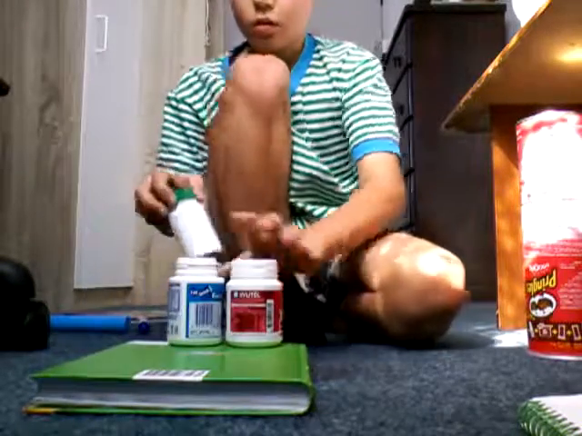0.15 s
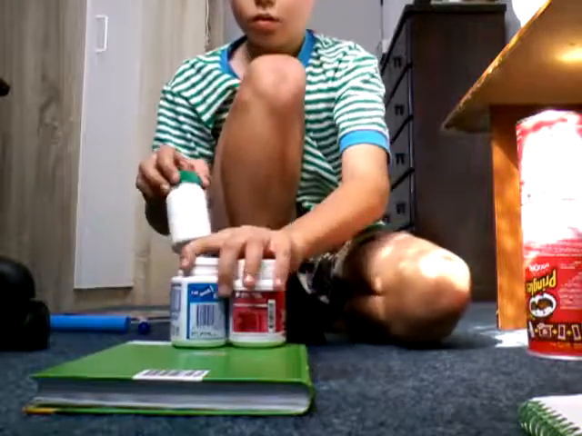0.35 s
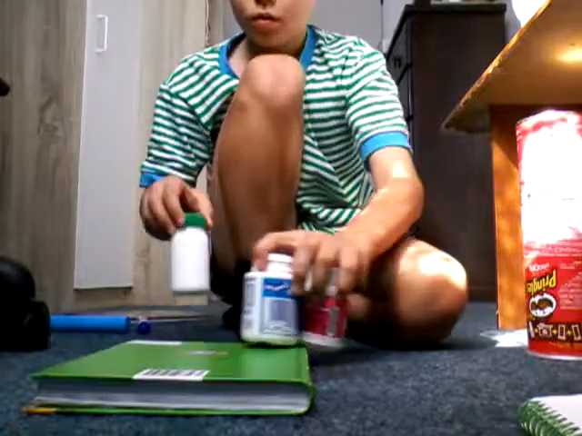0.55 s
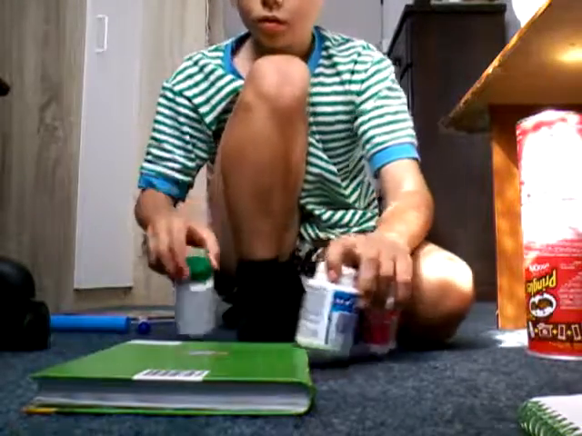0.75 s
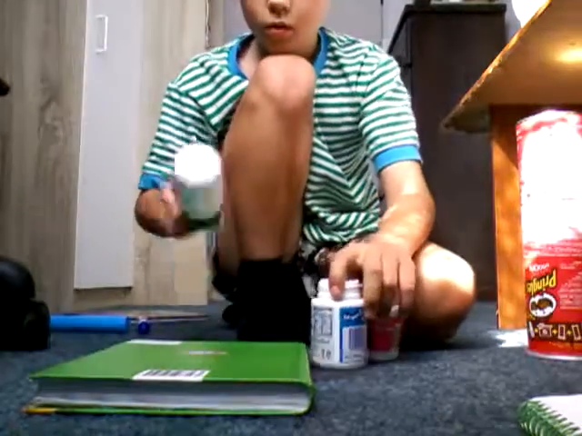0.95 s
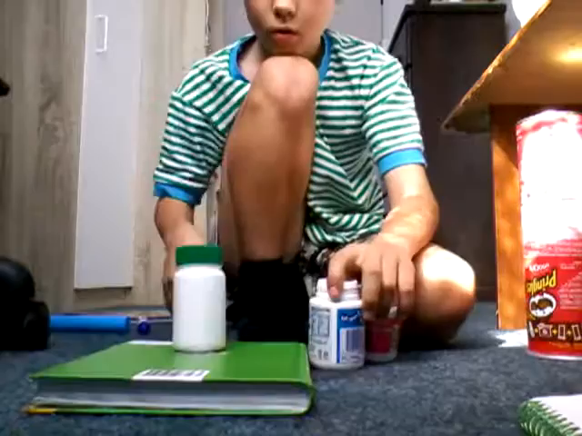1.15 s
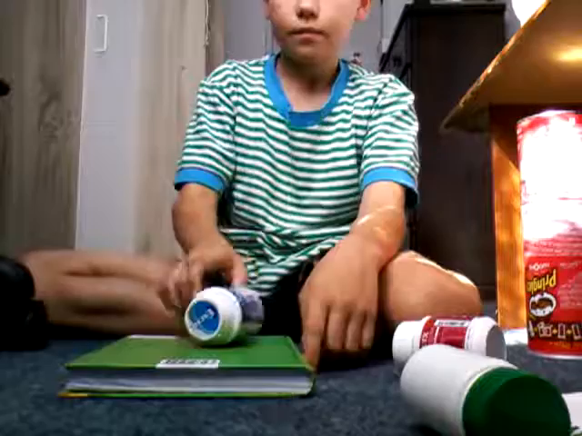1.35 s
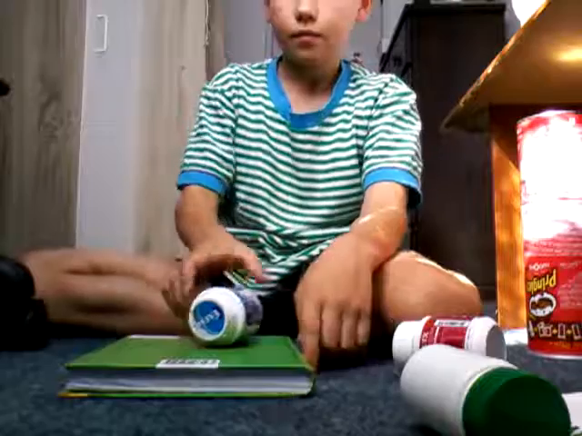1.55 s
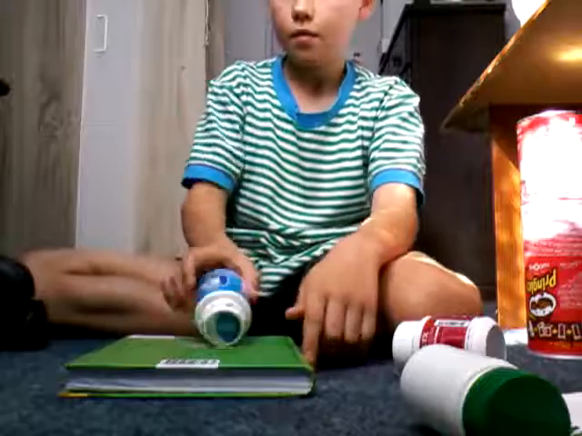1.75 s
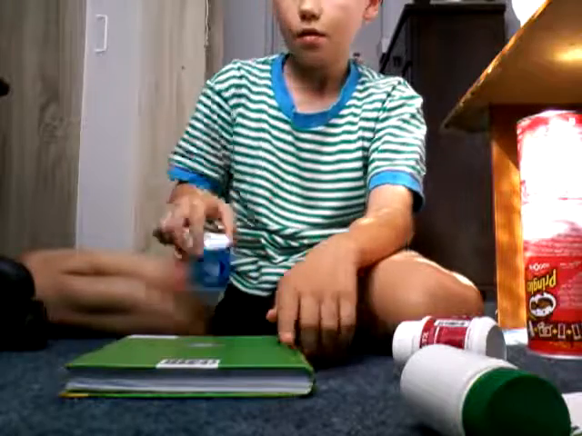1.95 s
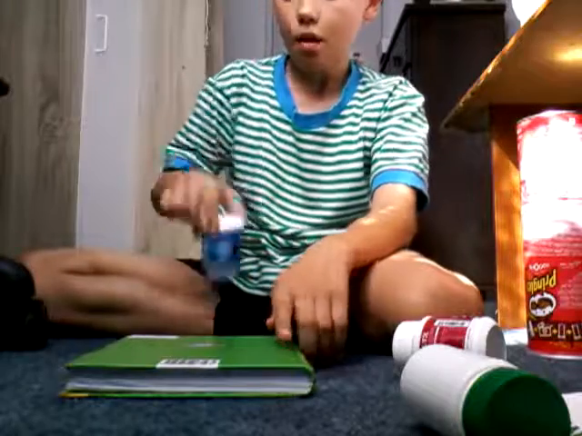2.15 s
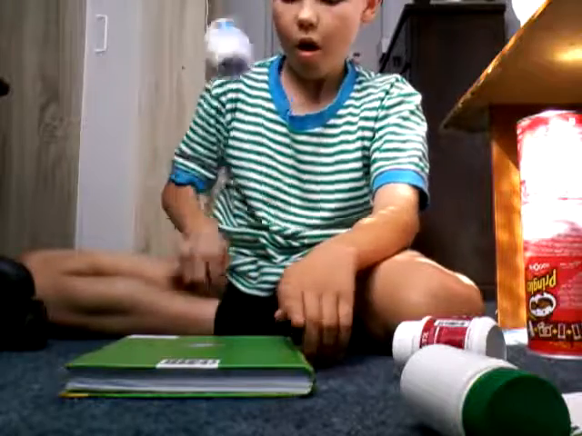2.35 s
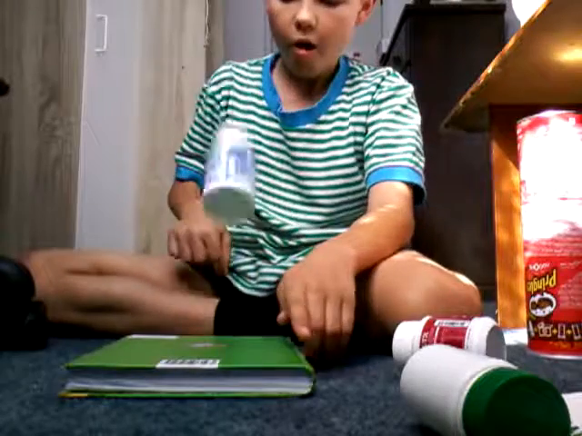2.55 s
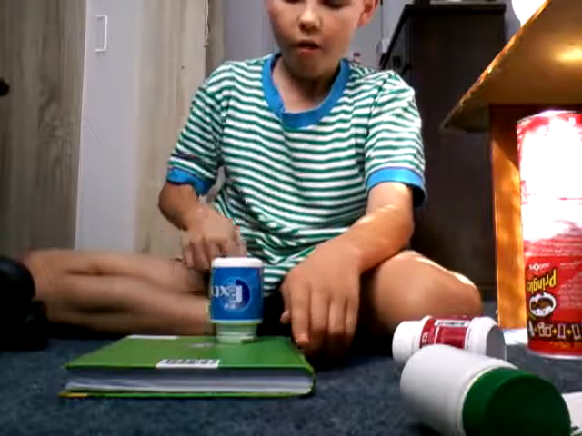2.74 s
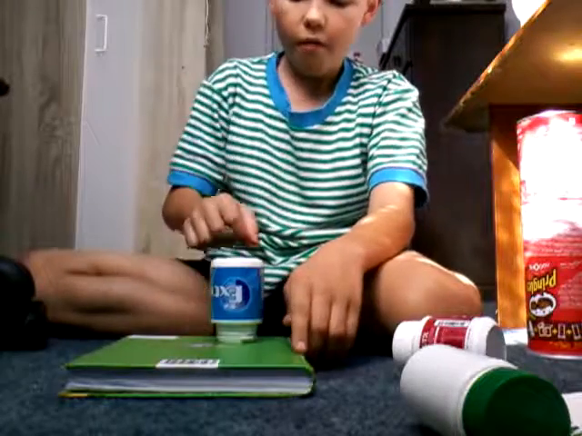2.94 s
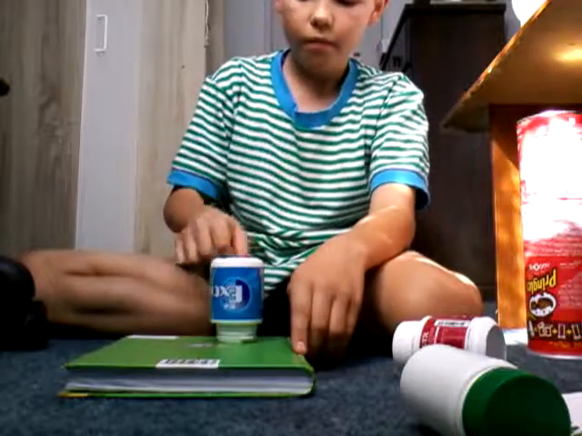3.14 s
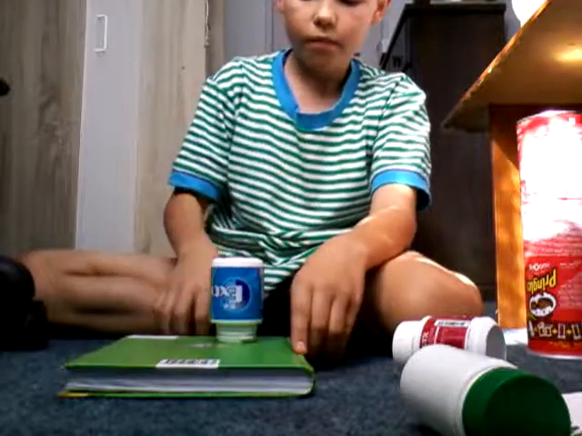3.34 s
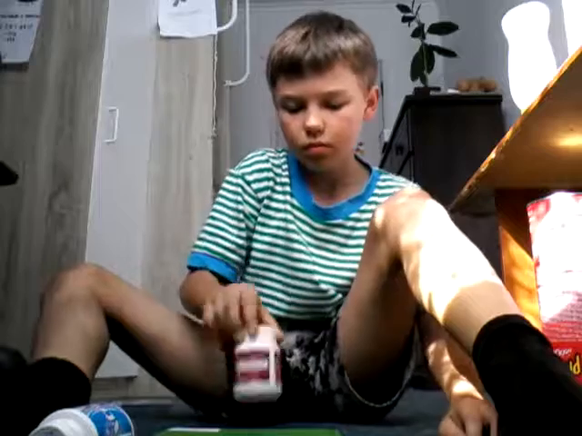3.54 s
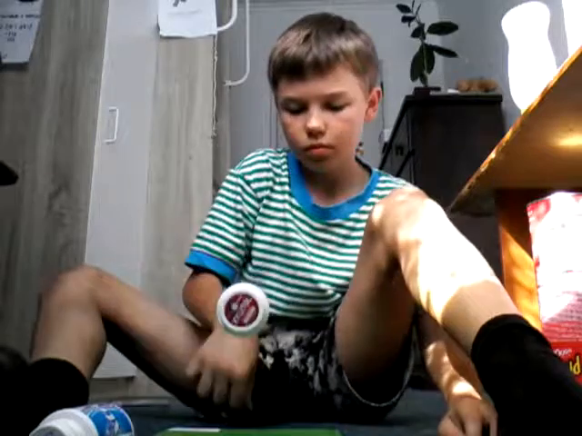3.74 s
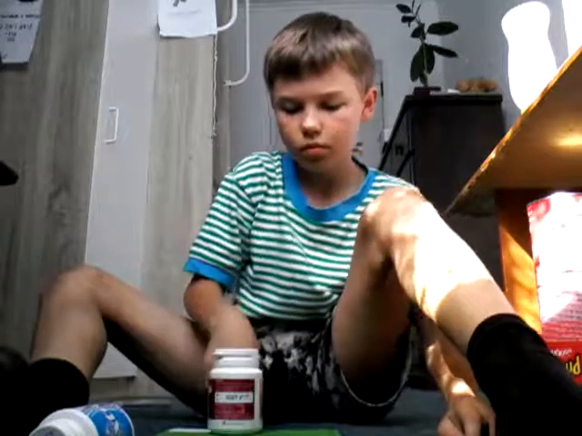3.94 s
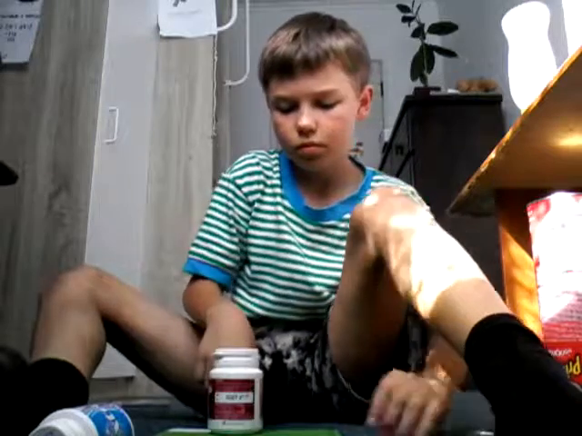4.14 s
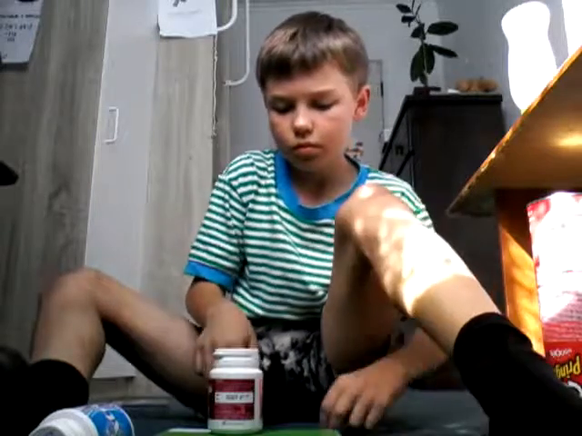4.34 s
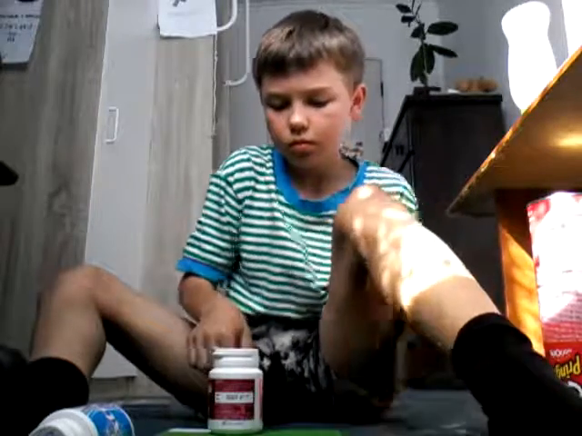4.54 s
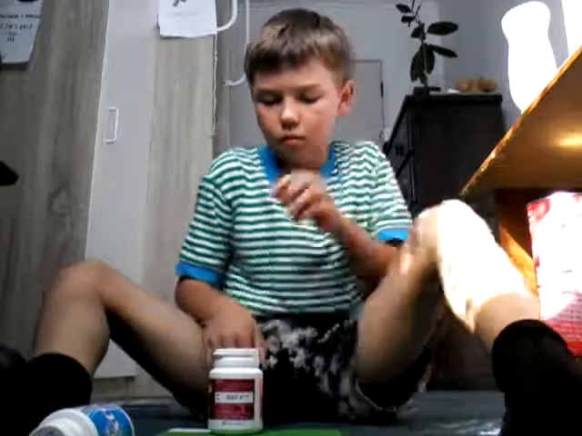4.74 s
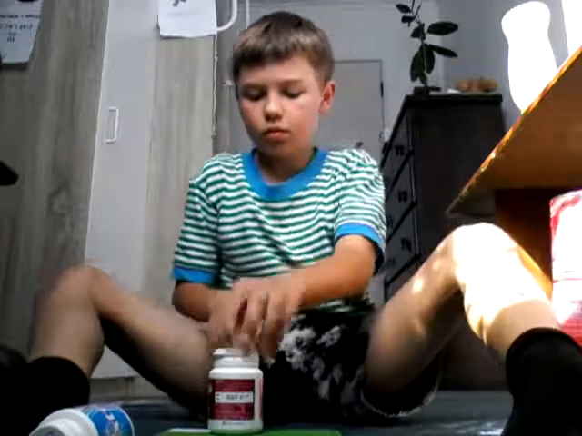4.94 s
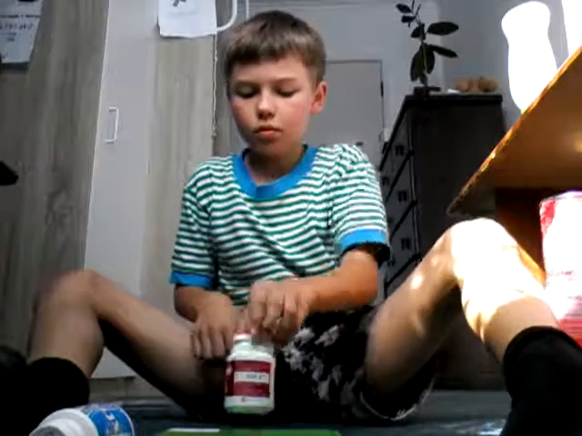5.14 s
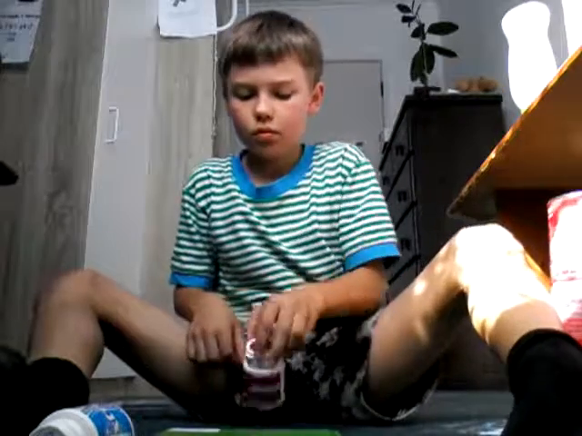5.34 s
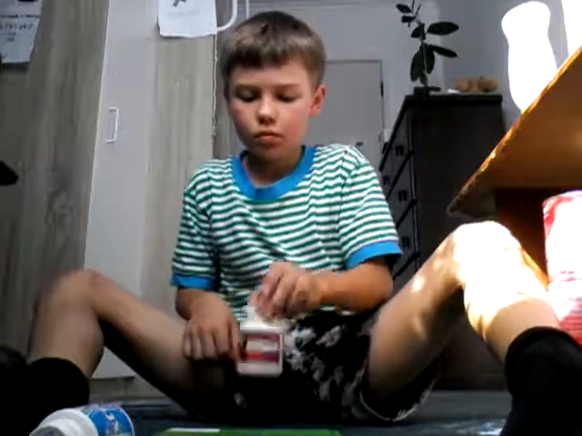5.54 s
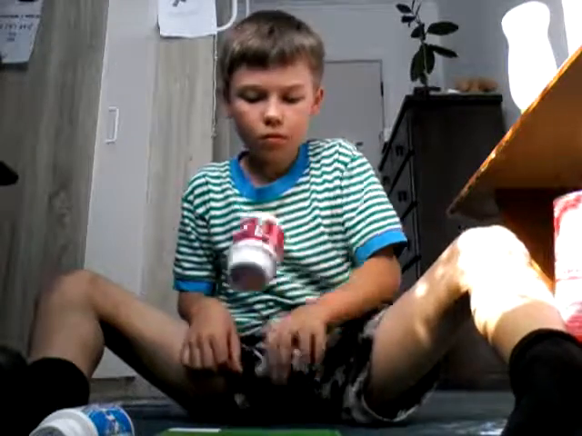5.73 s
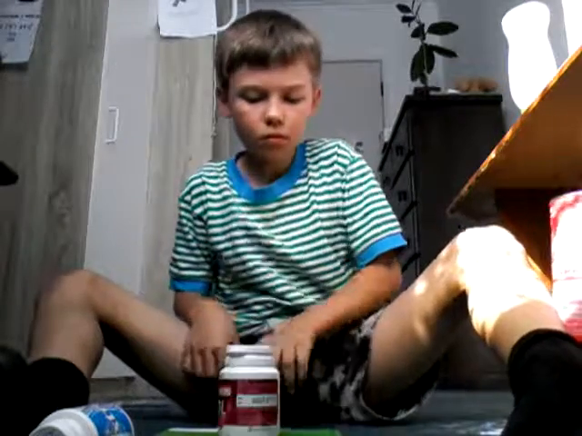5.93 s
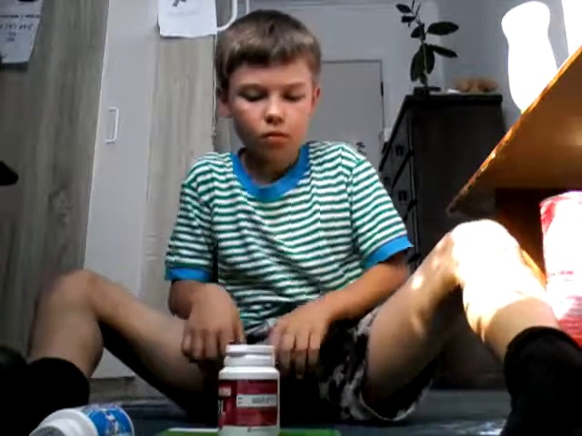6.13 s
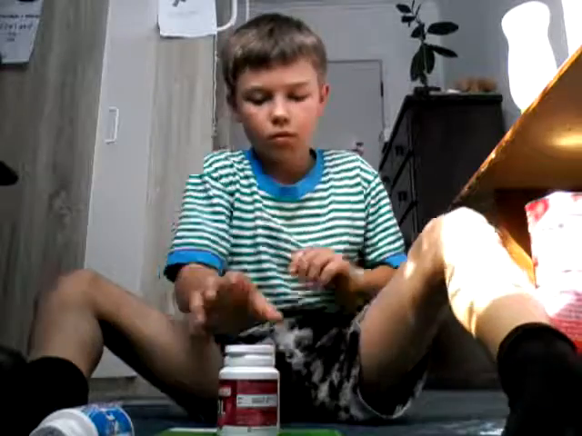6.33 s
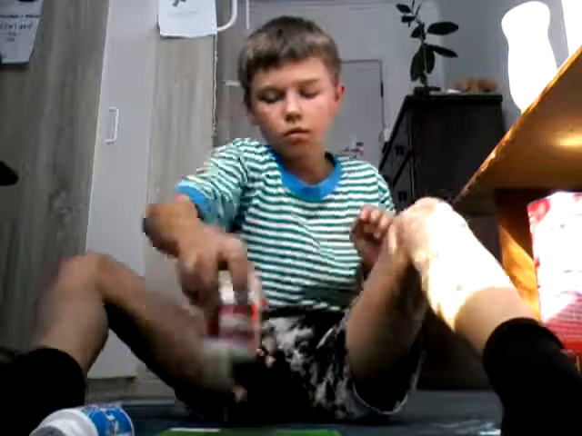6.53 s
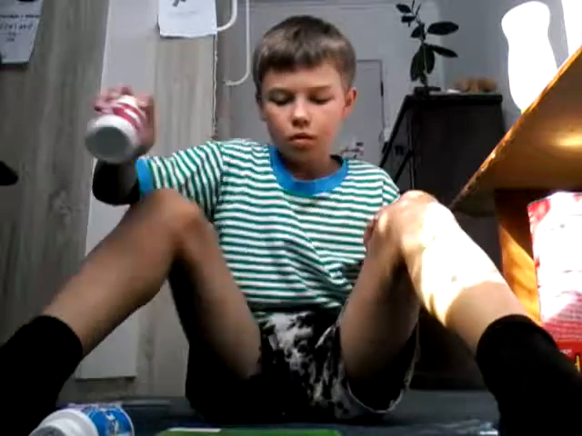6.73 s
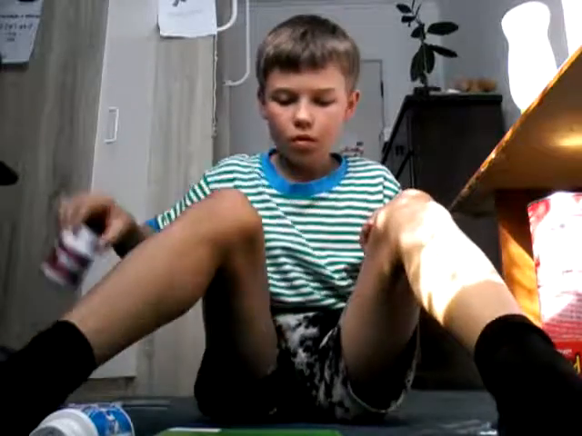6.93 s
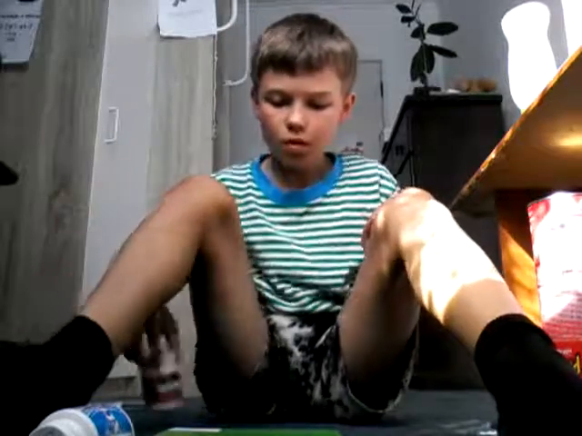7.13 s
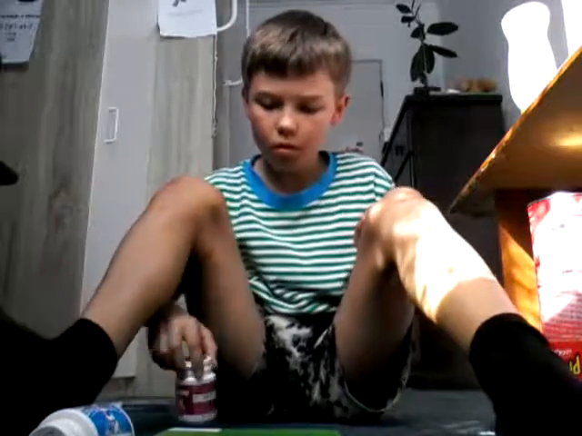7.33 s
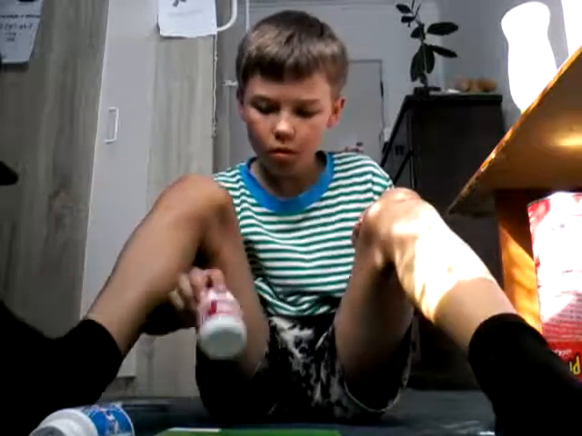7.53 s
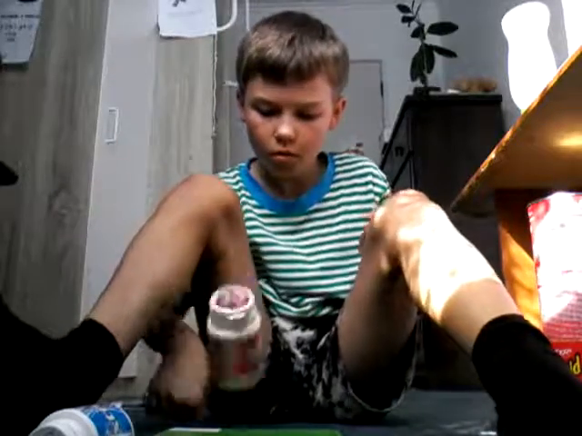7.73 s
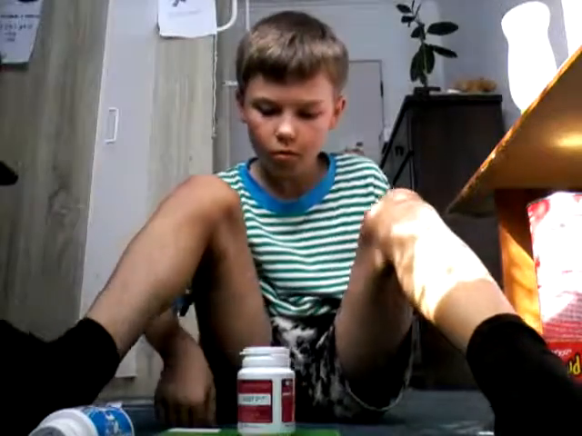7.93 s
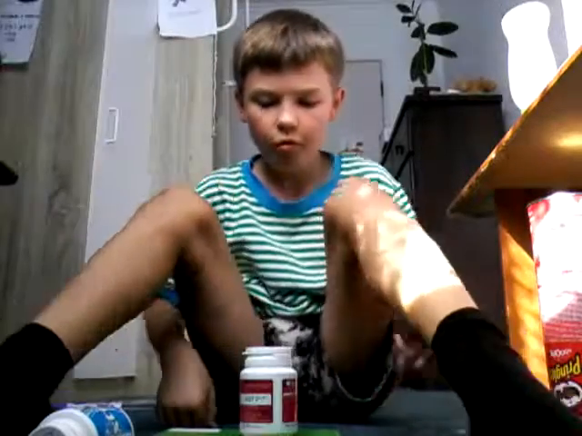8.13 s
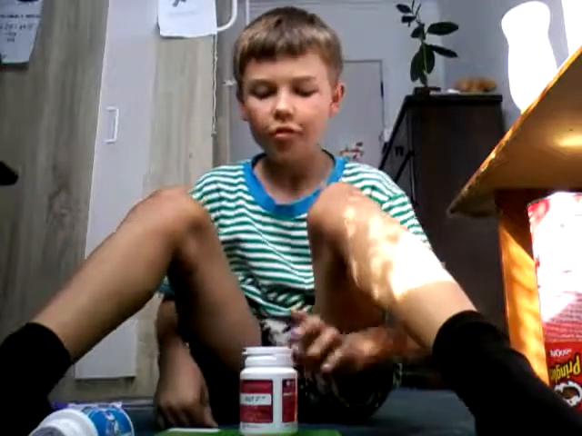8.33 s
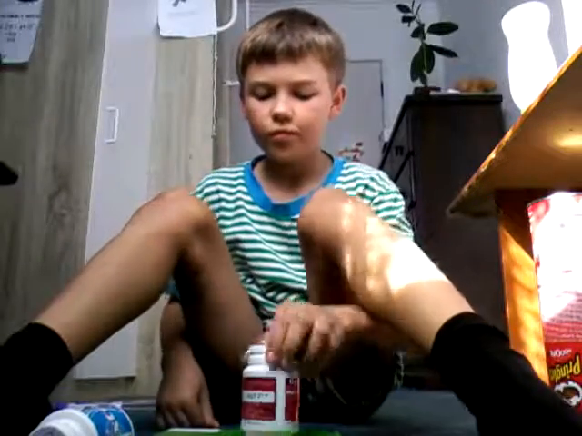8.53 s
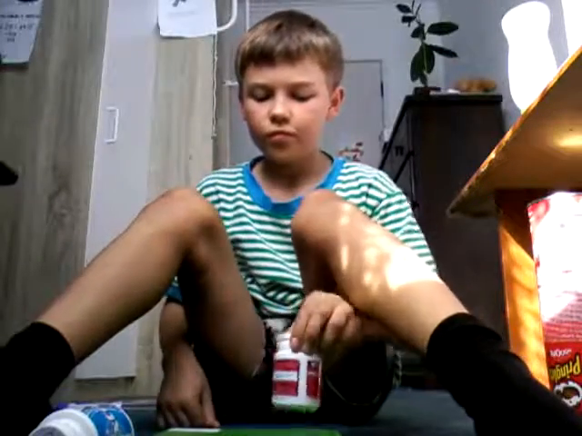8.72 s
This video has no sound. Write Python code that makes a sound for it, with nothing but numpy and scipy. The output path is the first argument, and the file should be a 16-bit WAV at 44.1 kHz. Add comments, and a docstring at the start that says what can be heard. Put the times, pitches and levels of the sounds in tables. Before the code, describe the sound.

Small plastic bottles rattle with pellets as they are flipped, landing with sharp knocks on a hardcover book in a quiet room.

```python
"""Pellet bottles landing on a book

Small plastic bottles holding a few hard pellets are flicked, tumble and land on a hardcover book
on carpet. Each landing thumps the book, rings the hollow bottle and throws pellets against its wall.
Cloth rustles and a small room answers, through a small peaky microphone with a faint whine.
The sound runs in four stretches, each with its own room tone level, and one short silence."""
import sys
import numpy as np
from scipy import signal
from scipy.fft import rfft, irfft
from scipy.io import wavfile
from scipy.ndimage import uniform_filter1d

SR = 44100
rng = np.random.default_rng(int(sys.argv[2]) if len(sys.argv) > 2 else 0)


def generate_wav(sig):
    """Save sig (samples, or channels by samples) to the path in sys.argv[1] as 16-bit PCM at SR."""
    pcm = np.round(np.clip(np.atleast_2d(sig).T, -1, 1) * 32767).astype(np.int16)
    wavfile.write(sys.argv[1], SR, pcm)


N = 387198
T = np.arange(N) / SR

# audible stretches: start/s, end/s, room tone level/dB
STRETCHES = [(0, 1.217, -49), (1.222, 1.372, -63), (1.473, 3.372, -57.5), (3.377, 8.98, -48)]
# bottle wall modes: f/Hz, level/dB, t60/s
WALL_MODES = [(620, -13, 0.012), (1460, -2.5, 0.0067), (2093, 0, 0.007), (2920, 1.5, 0.0054),
              (4330, 2.5, 0.0033), (5470, 3, 0.0048), (6386, 8.5, 0.0021), (7530, 4, 0.003),
              (9400, 10.5, 0.001), (12300, -4, .002), (14000, -16.5, .002)]


def undb(db):
    return 10 ** (np.asarray(db) / 20)


def unit(x):
    """Scale to rms 1."""
    return x / np.sqrt(np.mean(x ** 2))


def ring(x, hz, t60):
    """One decaying mode driven by x."""
    p = np.exp(2j * np.pi * hz / SR - np.log(1000) / (t60 * SR))
    return signal.lfilter([0, p.imag], [1, -2 * p.real, abs(p) ** 2], x)


def shaped(points, size):
    """Noise with a spectrum of (Hz, dB) points."""
    hz, db = np.transpose(points)
    f = np.arange(size // 2 + 1) * SR / size + 1
    return unit(irfft(rfft(rng.standard_normal(size)) * undb(np.interp(np.log(f), np.log(hz), db)), size))


def add(out, s, x):
    """Mix x into out from time s."""
    i = int(s * SR)
    out[i:i + len(x)] += x[:len(out) - i]


def random_gain(depth_db, samples):
    """Random gain, smoothed over samples; depth_db is rms."""
    return undb(depth_db * unit(uniform_filter1d(rng.standard_normal(N), samples)))


def swell(starts_s, holds_s, levels_db, rise_db_per_s, fall_db_per_s):
    """Gain of events that rise, hold and fall at steady dB slopes."""
    return sum(undb(db + np.minimum(0, rise_db_per_s * (T - s))
                    - fall_db_per_s * np.maximum(0, T - s - hold_s))
               for s, hold_s, db in zip(starts_s, holds_s, levels_db))


def bump(x, hz, width_hz, db):
    """Lift a band around hz."""
    return x + (undb(db) - 1) * signal.lfilter(*signal.iirpeak(hz, hz / width_hz, SR), x)


def room_tone():
    """Steady hush with narrow peaks, drifting a little in level."""
    # hush spectrum: f/Hz, density/dB
    hush_spectrum = [(15, -65), (25, -31.5), (76, -2), (200, -4.5), (263, -3), (489, -8), (677, -8.5),
                     (775, -9), (2160, -23), (3920, -25.5), (5000, -13.5), (8360, -45), (13600, -37.5),
                     (14800, -27), (16000, -36)]
    # peaks in the hush: f/Hz, width/Hz, lift/dB
    hush_peaks = [(72, 6.3, 14), (145.5, 8.2, 12.5), (268.6, 17, 12), (372.6, 17, 7), (643.4, 8, 10),
                  (1660, 10, 11), (2600, 120, 9.5), (5070, 370, 3.5), (9530, 840, 20), (10840, 110, 7)]
    hush = shaped(hush_spectrum, N)
    for hz, width_hz, db in hush_peaks:
        hush = bump(hush, hz, width_hz, db)
    return unit(hush) * random_gain(0.23, 9000)


def electronics_whine():
    """Faint high sine from the electronics."""
    # whine in the first stretch: f/Hz, rms level/dB
    whine_tones = [(15000, -66)]
    return sum(undb(db) * np.sqrt(2) * np.sin(2 * np.pi * hz * T) for hz, db in whine_tones)


def strike(modes, push, scatter_db, detune=0., resonator=ring):
    """Modes rung by one push, each with random strength and a shift from the load on it; peak 1."""
    strengths, shifts = rng.standard_normal((2, len(modes)))
    y = sum(undb(db + scatter_db * strength) * resonator(push, hz * (1 + detune * shift), t60)
            for strength, shift, (hz, db, t60) in zip(strengths, shifts, modes))
    return y / np.abs(y).max()


def light_contact(x):
    """Small light things radiate no bass; their contact is too soft for the top treble."""
    low_cut = signal.butter(2, 800, "high", fs=SR, output="sos")
    high_cut = signal.butter(2, 10500, fs=SR, output="sos")
    return signal.sosfilt(np.vstack([low_cut, high_cut]), x)


def pellets(hits_per_s, spread_db):
    """Random pellet hits on the wall, each mode taking its own share; rms 1."""
    hits = (rng.random(N) < hits_per_s / SR) * undb(spread_db * np.minimum(rng.exponential(size=N), 3.5))
    rattle = sum(undb(db) * ring(hits * rng.standard_normal(N), hz, t60) for hz, db, t60 in WALL_MODES)
    return unit(light_contact(rattle))


def knocks():
    """Each blow cracks, thumps the book and rings the bottle; thrown pellets bounce, then settle."""
    # blows: t/s, thump peak/dB, crack peak/dB, bottle peak/dB, pellet level/dB, contact/ms
    blows = [(0.291, -33.5, -38, -51, -58, 0.51), (.335, -21.5, -43, -50, -33.5, 0.34),
             (.350, -23, -45, -24, -47, 0.15), (0.661, -36, -35.5, -36.5, -73, .7),
             (1.145, -1, -5, -17, -41, 0.16), (1.157, -15, -37, -41, -33.5, 1.8),
             (1.842, -24.5, -41, -60, -59, 0.21), (2.692, -7, -7.5, -16, -11.5, 0.53),
             (3.796, -51, -55, -37, -61, 0.36), (3.812, -49, -34.5, -27.5, -35.5, 0.37),
             (3.927, 1.4, -6.5, -3.5, -42, 0.96), (3.941, -13, -18, -47, -30.5, 1.1),
             (5.825, -45, -47, -22.5, -46.5, 0.82), (5.974, 4.5, -2.5, -18, -30, 0.67),
             (6.001, -7.5, -23, -52, -35.5, 0.58), (6.038, -20.5, -31, -55, -41.5, 1.7),
             (6.198, -42, -48, -68, -49, 1.3), (7.672, -89, -41, -37, -60, 2.1),
             (7.706, -59, -50, -41.5, -66, .8), (7.765, -48, -22.5, -22.5, -43, 0.4),
             (7.885, -1, -3.5, -47, -22.5, 1.1), (7.896, -31, -31, -40, -29.5, 0.83),
             (7.988, -11, -22.5, -47, -42.5, 0.66), (8.070, -41, -30.5, -48, -69, 0.8)]
    # modes of cover, pages and floor: f/Hz, level/dB, t60/s
    book_modes = [(84, -11, 0.19), (124, -13.5, 0.27), (186.2, -5, 0.16), (247, -1.5, 0.086),
                  (291.4, 11, 0.033), (399.4, -3.5, 0.11), (454.2, -3, 0.13), (508, 10, 0.034),
                  (890, -8, 0.05), (1350, -27.5, 0.017), (1572, -7.5, 0.048), (2050, -6.5, 0.02)]
    # air and shell of each bottle: in use until/s, modes (f/Hz, level/dB, t60/s)
    bottles = [(1.3, [(590, 17, 0.04), (897, -13, 0.12)]), (3.385, [(377, -2.5, 0.23), (439, 1, 0.15)]),
               (9, [(592.5, 1, 0.075)])]
    crack_hz, crack_decay_s = 1574, 0.0025
    crack_spectrum = [(crack_hz / 4, -20), (crack_hz, 0), (crack_hz * 2, -9), (5500, -14), (16000, -44)]
    bounce_s, settle_s = 0.0027, 0.018
    impacts, thrown = np.zeros(N), np.zeros(N)
    t = T[:SR // 2]
    for s, thump_db, crack_db, bottle_db, pellet_db, contact_ms in blows:
        push = np.where(t < contact_ms / 1000, np.sin(np.pi * t * 1000 / contact_ms), 0)
        crack = shaped(crack_spectrum, len(t)) * np.exp(-t / crack_decay_s)
        crack /= np.abs(crack).max()
        thump = undb(thump_db) * strike(book_modes, push, scatter_db=0.53, detune=0.046)
        t60_share = 0.5 if thump_db > bottle_db else 1  # standing on the book damps the bottle
        free_modes = next(modes for until_s, modes in bottles if s < until_s)
        bottle_modes = [(hz, db, t60 * t60_share) for hz, db, t60 in free_modes]
        hollow = undb(bottle_db) * strike(bottle_modes, push, scatter_db=0)
        add(impacts, s, undb(crack_db) * crack - thump - hollow)  # cover recedes: pressure drops first
        add(thrown, s, undb(pellet_db) * np.exp(-np.maximum(t - bounce_s, 0) / settle_s))
    rattle = thrown * pellets(hits_per_s=4000, spread_db=5)
    dulling = signal.butter(1, 6000, fs=SR, output="sos")  # pellets on pellets sound duller
    return impacts + signal.sosfilt(dulling, rattle)


def rustle():
    """Sleeves and hands on cloth and carpet: fine grains over a dull shuffle through the floor."""
    # movements: full from/s, hold/s, grain level/dB, shuffle level/dB
    cloth_moves = [(.3, 0.016, -69, -49), (0.365, 0.017, -50, -73), (0.487, 0.063, -49, -46.5),
                   (0.646, 0.097, -62, -50), (1.333, 0.021, -57, -78.5), (1.961, 0.24, -52.5, -48),
                   (3.393, 0.018, -62, -57.5), (4.06, 0.013, -59.5, -48.5), (4.526, 0.068, -68, -81),
                   (4.99, 0.024, -57.5, -78), (6.095, 0.11, -57, -49), (6.503, 0.073, -66, -48),
                   (6.74, 0.11, -52, -61), (7.04, 0.0068, -58, -52), (7.147, 0.015, -52.5, -48.5),
                   (7.68, 0.083, -63, -50), (7.983, 0.018, -48.5, -37), (8.17, 0.045, -52, -47)]
    starts_s, holds_s, fine_db, dull_db = np.transpose(cloth_moves)
    slopes = dict(rise_db_per_s=297, fall_db_per_s=138.5)
    grain = random_gain(2.1, 200)
    hiss = shaped([(300, -0.5), (1200, -3.5), (3500, -10), (5200, -10), (9000, -16.5), (16000, -21.5)], N)
    shuffle = shaped([(30, -32), (70, 9.5), (250, 0.5), (600, -9.5), (2000, -50.5)], N)
    tone_gain = sum(undb(db) * ((T >= start_s) & (T < end_s)) for start_s, end_s, db in STRETCHES)
    fidget = undb(-13) * tone_gain * random_gain(3, 4000)  # cloth never lies quite still
    fine = (swell(starts_s, holds_s, fine_db, **slopes) + fidget) * unit(hiss * grain)
    return fine + swell(starts_s, holds_s, dull_db, **slopes) * shuffle


def soft_ring(x, hz, t60):
    """A mode that swells briefly before it dies: light contacts have no sharp edge."""
    return ring(ring(x, hz, t60), hz, t60) * 2 * np.e * np.log(1000) / (t60 * SR)


def ticks():
    """Single pellets and nails ring the wall: heavy hits its low modes, glancing ones its high modes."""
    # hits on the wall: t/s, level/dB, low mode offset/dB, high mode offset/dB
    wall_hits = [(0.3575, -12, 6, 2), (1.0192, -29, -45.5, 0), (1.036, -36.5, -28, -5),
                 (1.0515, -28, -25, -2.5), (1.066, -43.5, -14.5, -29), (1.3317, -35, 5.5, 5),
                 (1.8114, -32, 4.5, 4), (1.87, -16.5, 16, -24), (1.8831, -21, 5, -27),
                 (1.909, -18, 18.5, -14.5), (1.924, -14.5, 0, -2.5), (1.935, -35, -26.5, -19.5),
                 (1.9484, -16.5, 1.5, -34.5), (1.9831, -14, -3, -4.5), (2.0607, -29.5, 5, -31),
                 (2.149, -34, -23, -10), (2.184, -22, -3, -1.5), (2.209, -31, -28, -18.5),
                 (2.2727, -26.5, -11, -9.5), (2.298, -10, -10, -9.5), (2.318, -10, -50, 6.5),
                 (2.322, -18.5, -24.5, -2), (2.340, 1, -2.5, -27.5), (2.346, -7, -48, 3.5),
                 (2.364, -31.5, -24.5, -17.5), (2.381, -36, -21, -38.5), (2.4064, -4.5, -4, 4),
                 (2.456, -14, 10, -31), (2.759, -27.5, -25, -22), (2.8548, -29.5, 2.5, -1),
                 (3.5126, -32.5, -23, 2), (3.5378, -30.5, -23, -48), (3.549, -35, -32, 3),
                 (3.777, -34, 24.5, -4), (3.7909, -25, -10, 8), (4.0555, -31.5, -2, -52),
                 (5.811, -32.5, -32, -17), (7.037, -28, 1, 7.5), (7.7374, -24.5, -1, 9)]
    out = np.zeros(N)
    impulse = (T[:4096] == 0) * 1.
    for s, db, low_db, high_db in wall_hits:
        modes = [(hz, mode_db + np.interp(hz, [3000, 4300, 6200, 7700], [low_db, 0, 0, high_db]), t60)
                 for hz, mode_db, t60 in WALL_MODES]
        add(out, s, undb(db) * strike(modes, impulse, scatter_db=2.5, detune=0.05, resonator=soft_ring))
    return light_contact(out)


def pellet_pours():
    """Pellets pour over one another as a bottle turns."""
    # pellet flows: full from/s, hold/s, level/dB
    flows = [(1.014, 0.04, -55), (1.883, 0.061, -38.5), (2.215, 0.0085, -46), (2.327, 0.086, -22),
             (3.526, 0.022, -54.5), (3.8, 0.0057, -52), (5.824, 0.0087, -46.5), (7.753, 0.01, -45.5)]
    flow = swell(*np.transpose(flows), rise_db_per_s=498.5, fall_db_per_s=379)
    return flow * pellets(hits_per_s=2600, spread_db=5.6)


def room():
    """Impulse response: direct sound, then noise bands dying at their own pace."""
    # reverberation bands: f/Hz, level/dB, t60/s
    reverb_bands = [(255, -4, 0.2), (1050, 2.5, 0.2), (2218, 1, 0.23), (4330, 11, 0.19),
                    (10600, -10.5, 0.31)]
    build_s, tail_db = 0.0037, -11
    t, tail = T[:SR // 2], 0
    for hz, db, t60 in reverb_bands:
        band = shaped([(hz / 8, -50), (hz, 0), (hz * 4, -30)], len(t))
        tail += undb(db) * band * np.exp(-np.log(1000) * t / t60)
    tail *= 1 - np.exp(-t / build_s)
    return (t == 0) + undb(tail_db) * tail / np.sqrt(np.sum(tail ** 2))


def mic_port(x):
    """The port in front of the capsule resonates."""
    return bump(x, hz=5045, width_hz=520, db=10.5)


def scene():
    """Bottles, cloth and room tone; events ring on only until their stretch ends."""
    bottles = knocks() + ticks() + pellet_pours()
    tone, whine, cloth = room_tone(), electronics_whine(), rustle()
    first_tone_db = STRETCHES[0][2]
    out = np.zeros(N)
    for start_s, end_s, tone_db in STRETCHES:
        on = ((T >= start_s) & (T < end_s)) * 1.
        in_room = signal.fftconvolve(bottles * on, room())[:N]
        background = undb(tone_db) * tone + undb(tone_db - first_tone_db) * whine
        out += uniform_filter1d(on, 260) * (mic_port(in_room + cloth) + background)  # 6 ms fades
    return out[None]


def record(dry):
    """Bass cut, faint circuit rumble while sound passes, rounded peaks, steep treble cut."""
    low_cut_hz, high_cut_hz, drive = 68, 15700, 1.1
    thinned = signal.sosfilt(signal.butter(6, low_cut_hz, "high", fs=SR, output="sos"), dry)
    rumble = undb(-82) * shaped([(20, -7.5), (60, -5.5), (150, -48.5)], N) * (np.abs(dry) > 1e-7)
    rounded = np.tanh(drive * (thinned + rumble)) / drive
    return signal.sosfilt(signal.ellip(8, 0.2, 70, high_cut_hz, fs=SR, output="sos"), rounded)


dry = scene()
out = record(dry)
generate_wav(out)
```